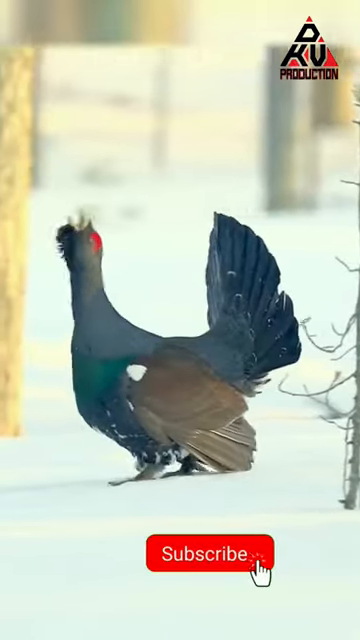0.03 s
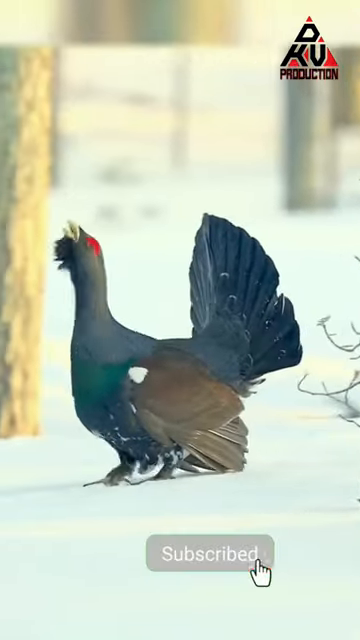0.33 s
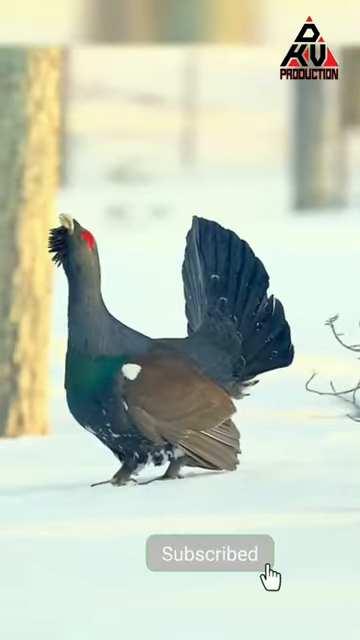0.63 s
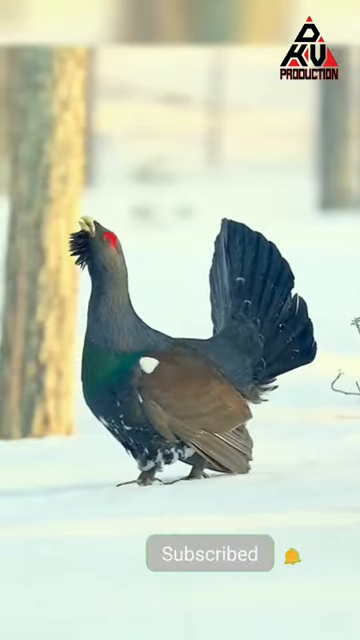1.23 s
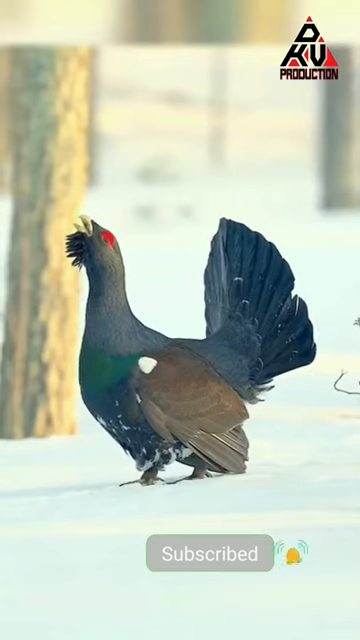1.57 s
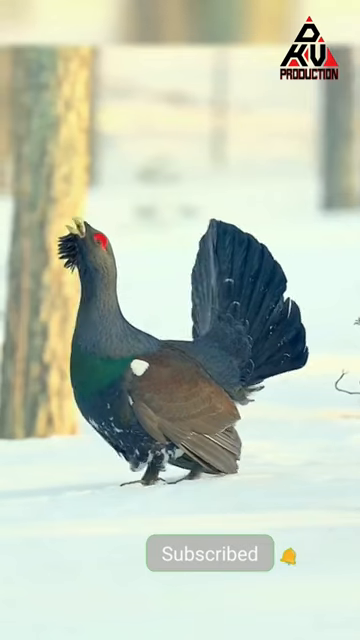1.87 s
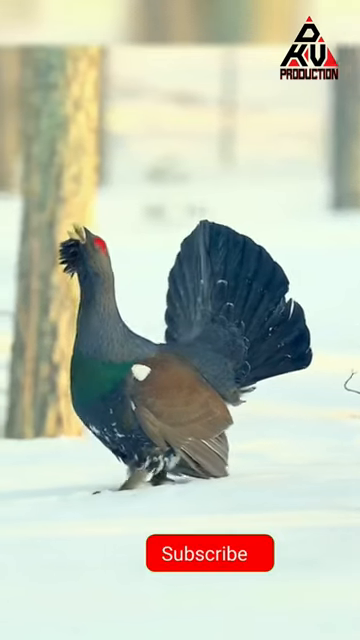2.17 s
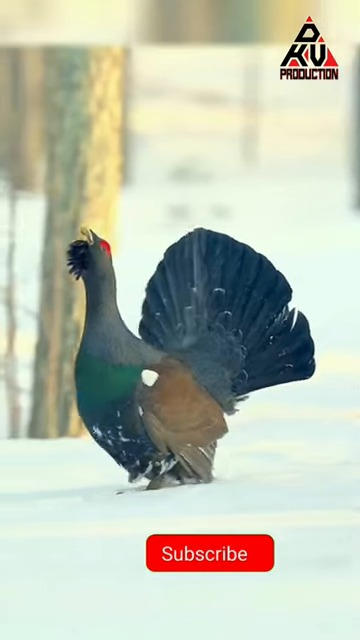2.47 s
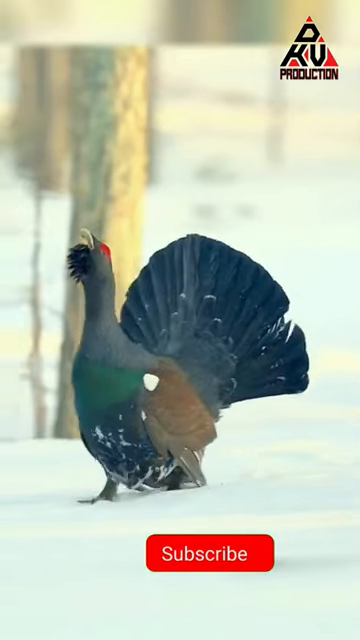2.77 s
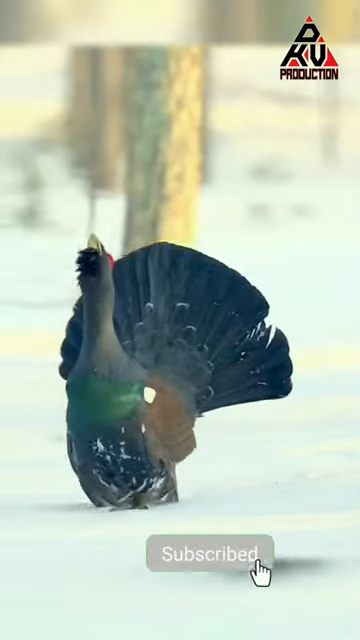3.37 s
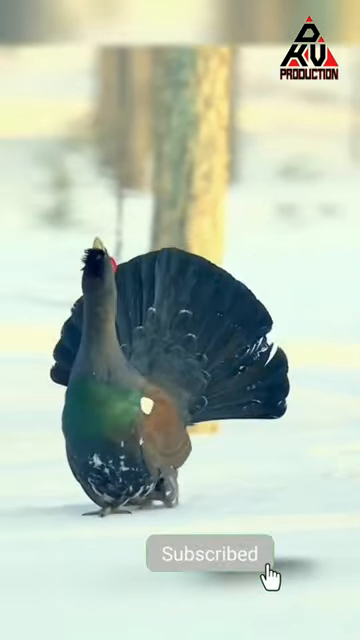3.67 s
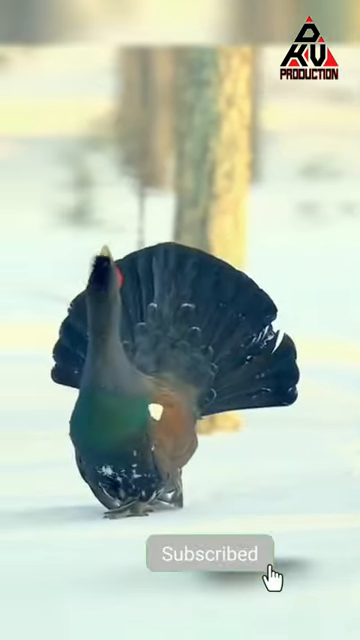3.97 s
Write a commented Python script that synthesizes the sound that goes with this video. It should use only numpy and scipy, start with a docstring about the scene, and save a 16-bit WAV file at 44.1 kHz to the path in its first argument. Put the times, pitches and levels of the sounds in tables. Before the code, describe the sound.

A large grouse calls straight ahead in a forest, starting with quick, squeaky rasps like a blade being sharpened until about 1.2 seconds. From around 1.8 seconds come sharp, hollow clicks, often in pairs, with hard ones near 1.9, 2.4 and 2.9 seconds. They speed up into a loud, short rattle around 3.7 seconds. A faint echo follows them, over steady hiss and a slight low rumble.

```python
"""First comes a second of raspy syllables, like a blade being whetted: a capercaillie in a snowy forest.
The bird rasps by pushing air through its throat. Then sharp releases make the throat ring in hollow
clicks, which come in pairs and speed up. The trees answer faintly. Hiss, a little rumble, a low hum
and thin whines run underneath, and a limiter briefly turns everything down after each hard click."""
import sys
import numpy as np
from scipy import signal
from scipy.fft import rfft, irfft, next_fast_len
from scipy.io import wavfile
from scipy.ndimage import uniform_filter1d, minimum_filter1d, map_coordinates

SR = 44100
rng = np.random.default_rng(int(sys.argv[2]) if len(sys.argv) > 2 else 0)


def unload_audio(sound):
    """Save the sound as a 16-bit wav file, at the path given as the first command line argument."""
    columns = np.transpose(np.atleast_2d(sound))
    # keep every value between -1 and 1, then stretch to whole-number steps
    steps = np.round(np.clip(columns, -1, 1) * 32767)
    wavfile.write(sys.argv[1], SR, steps.astype(np.int16))


N = 176400
TIME_S = np.arange(N) / SR


def amp(db):
    """Turn decibels into a number to multiply by."""
    return 10 ** (np.asarray(db) / 20)


def unit(x):
    """Scale a signal to an average strength (rms) of 1."""
    return x / np.sqrt(np.mean(x ** 2) + 1e-20)


def wobble(per_s):
    """A smooth curve through per_s random values a second."""
    return map_coordinates(rng.standard_normal(N // 8), [TIME_S * per_s], mode="mirror")


def filtered(x, gain_at):
    """Multiply each frequency in x by gain_at(hz)."""
    size = next_fast_len(N + SR // 4)
    return irfft(rfft(x, size) * gain_at(np.fft.rfftfreq(size, 1 / SR)), size)[..., :N]


def coloured(x, colour):
    """Shape the lows and highs of x with rows of (pitch_hz, gain_db)."""
    pitch_hz, gain_db = np.transpose(colour)
    return filtered(x, lambda hz: amp(np.interp(np.log(hz + 1), np.log(pitch_hz + 1), gain_db)))


def noise(colour):
    """Noise of the given colour and of strength 1."""
    return unit(coloured(rng.standard_normal(N), colour))


def fade(t, fade_s):
    """Die away by 60 dB every fade_s seconds."""
    return np.exp(-np.log(1000) * t / fade_s)


# How the throat colours rushing air: pitch_hz, gain_db
THROAT_COLOUR = [(300, -55), (1200, -34), (1600, -24), (2000, -9), (2500, -2), (3150, -4), (3600, -1.5),
                 (4000, -12), (4700, -17), (5400, -16), (5900, -8), (6550, -7), (6750, -29), (7600, -21),
                 (8450, -21), (9000, -38), (16000, -52)]
# The crisp top of a syllable: pitch_hz, gain_db
EDGE_COLOUR = [(7000, -17), (9200, -12), (11300, -9), (12650, 2), (12950, -11)]
# One syllable a row: start_s, rise_s, hold_s, fade_s, level_db,
# squeak_from_hz, squeak_to_hz, squeak_db (compared with the rasp)
SYLLABLES = [(-.02, 0.07, .02, 0.1166, -13, 2050, 2930, -4.5),
             (0.113, 0.017, 0.013, .10, -13.5, 2710, 2450, -4),
             (0.2, 0.0088, 0.0068, 0.22, -10, 3700, 2184, -1),
             (0.244, 0.025, 0.0046, 0.4, -18, 2500, 2400, -1.5),
             (0.401, 0.017, 0.0153, 0.092, -13.5, 2150, 2458, -3.5),
             (0.478, 0.04, 0.049, 0.12, -12.5, 2590, 3127, 0.5),
             (0.61, 0.022, 0.0055, 0.11, -15.5, 3300, 2355, -6),
             (0.646, 0.0063, 0.0092, 0.034, -21, 2200, 2180, 18),
             (0.707, 0.0082, 0.0074, 0.066, -17, 2690, 1905, -2.5),
             (0.771, 0.0022, 0.025, 0.27, -13.5, 2700, 2264, -2),
             (0.819, 0.023, 0.012, 0.22, -24.5, 2300, 2478, -2),
             (0.914, 0.035, 0.0056, 0.0556, -16.5, 2150, 3050, 3),
             (1.096, 0.052, 0.0069, 0.089, -20.5, 2400, 2440, 11)]
def whetting():
    """Gritty air rushes through the throat, with a crisp edge and a rough, gliding squeak."""
    grit = amp(2.9 * wobble(per_s=520))  # a fast flicker in loudness
    rasp = unit(coloured(rng.standard_normal(N) * grit, THROAT_COLOUR))
    edge = amp(-28) * unit(grit * noise(EDGE_COLOUR))
    phase_jitter = 1.15 * wobble(per_s=330)
    flutter = np.sqrt(2) * unit(grit)
    out = np.zeros(N)
    for start_s, rise_s, hold_s, fade_s, level_db, from_hz, to_hz, squeak_db in SYLLABLES:
        t = TIME_S - start_s
        swell = np.clip(t / rise_s, 0, 1) ** 2 * fade(np.maximum(t - rise_s - hold_s, 0), fade_s)
        pitch_hz = np.interp(t, [0, rise_s + hold_s + fade_s / 10], [from_hz, to_hz])
        squeak = flutter * np.sin(2 * np.pi * np.cumsum(pitch_hz) / SR + phase_jitter)
        voice = amp(level_db) * (rasp + amp(squeak_db) * squeak) + amp(level_db / 2) * edge
        out += swell * voice / np.hypot(1, amp(squeak_db))
    return out


def patchy(x, depth_db=2.6, frame_samples=1024):
    """Make a noise uneven: random patches of pitch and time get a little louder or softer."""
    spectrum = signal.stft(x, nperseg=frame_samples)[2]
    patches = uniform_filter1d(rng.standard_normal(spectrum.shape), size=3, axis=0)
    patches = unit(uniform_filter1d(patches, size=12, axis=1))
    return unit(signal.istft(spectrum * amp(depth_db * patches), nperseg=frame_samples)[1][:N])


# The broad hiss: pitch_hz, gain_db
HISS_COLOUR = [(20, -67), (130, -21), (330, 0.5), (550, -2), (800, 6.5), (1100, 4), (1500, 6.5), (2600, -1),
               (4200, -1.5), (5400, 2), (6900, -9), (8300, 8.5), (9000, 4.5), (10500, 2.5), (13000, 3.5),
               (15000, -7.5), (15800, 5.5)]
# How much of the hiss spreads out to the sides: pitch_hz, gain_db
HISS_SPREAD = [(100, -16), (500, -35), (3000, -35), (5000, -24), (9000, -20), (14000, -17)]
# Its slow drift in loudness: time_s, level_db
HISS_LOUDNESS = [(0, -40.5), (.9, -37.5), (1.75, -34.5), (2.0, -38), (2.3, -36), (2.8, -37), (3.3, -39),
                 (3.7, -41), (4, -42)]
def hiss():
    """A broad, unbroken hiss, almost the same in the left and right ears."""
    level = amp(np.interp(TIME_S, *np.transpose(HISS_LOUDNESS)))
    centre = patchy(noise(HISS_COLOUR))
    side = coloured(noise(HISS_COLOUR), HISS_SPREAD)
    return level * np.array([centre + side, centre - side])


# A band of hiss around 3 kHz: pitch_hz, gain_db
MIDDLE_COLOUR = [(1000, -28), (1800, -16), (2100, -6), (2350, -11), (2600, -1), (2810, 2.5), (3200, -.5),
                 (3600, -2.5), (4100, -12.5), (6000, -16.5), (9000, -46)]
# A thinner, higher band: pitch_hz, gain_db
THIN_COLOUR = [(3000, -21.5), (4500, -12), (6200, -3.5), (6700, -11.5), (7300, -7), (8400, -8),
               (9200, -18.5), (14000, -20)]
# How loud the two bands are: time_s, middle_db, thin_db
BAND_LOUDNESS = [(0, -24, -35), (.4, -30, -35.5), (.75, -29, -34), (.9, -27.5, -30.5), (1.08, -29, -33.5),
                 (1.17, -28.5, -41), (1.33, -26.5, -45), (1.48, -30.5, -47), (1.6, -35, -42),
                 (2.0, -32, -49), (2.08, -40, -42.5), (2.35, -33, -43), (2.56, -29, -64), (2.8, -33, -38),
                 (3.2, -31, -55), (3.7, -31, -57), (4, -32, -40.5)]
def swelling_hiss():
    """Two narrower bands of hiss swell and sink."""
    time_s, middle_db, thin_db = np.transpose(BAND_LOUDNESS)
    middle = amp(np.interp(TIME_S, time_s, middle_db)) * patchy(noise(MIDDLE_COLOUR))
    thin = amp(np.interp(TIME_S, time_s, thin_db)) * noise(THIN_COLOUR)
    return middle + thin


# The deep rumble: pitch_hz, gain_db
RUMBLE_COLOUR = [(20, -3), (32, 0), (45, -19), (60, -31), (120, -43), (300, -38), (1000, -78)]
def rumble(sink_db_per_s=1.5):
    """A soft, unsteady rumble in both ears slowly gets quieter."""
    level = amp(-50 - sink_db_per_s * TIME_S + 3 * wobble(6))
    centre, side = noise(RUMBLE_COLOUR), amp(-14) * noise(RUMBLE_COLOUR)
    return level * np.array([centre + side, centre - side])


def hum(pitch_hz=189.4, sink_db_per_s=1.94):
    """One low, wavering tone slowly gets quieter."""
    level = amp(-60.5 - sink_db_per_s * TIME_S + 2.6 * wobble(7))
    return np.sqrt(2) * level * np.sin(2 * np.pi * pitch_hz * TIME_S + .5 * wobble(5))


# One high tone a row: pitch_hz, level_db
WHINE_TONES = [(7752, -54), (9130, -58), (13954, -62)]
def whines():
    """Faint, very high tones waver slightly."""
    out = np.zeros(N)
    for pitch_hz, level_db in WHINE_TONES:
        level = amp(level_db + .86 * wobble(2.9))
        out += np.sqrt(2) * level * np.sin(2 * np.pi * pitch_hz * TIME_S + .5 * wobble(8))
    return out


def forest_echo(bird):
    """Nearby trunks scatter a short answer, the wood behind them a long, faint one."""
    t = np.arange(SR) / SR
    near = rng.standard_normal(SR) * fade(t, fade_s=.19) * (t > .004)
    far = rng.standard_normal(SR) * fade(t, fade_s=1.2) * (1 - np.exp(-t / .0033))
    echo = amp(-18) * near / np.linalg.norm(near) + amp(-27) * far / np.linalg.norm(far)
    return signal.fftconvolve(bird, echo)[:N]


# The bright noise in a click's opening snap: pitch_hz, gain_db
TICK_COLOUR = [(1800, -16.5), (4700, -0.5), (6000, -8), (13000, -24)]
# The throat's weaker tones: pitch_hz, level_db (compared with the main tone), fade_s (in a soft click)
WEAK_TONES = [(2430, -24, 0.076), (3900, -18, 0.023), (4200, -23, 0.093), (4800, -24, 0.036),
              (5730, -22, 0.027), (6760, -36, 0.036)]
# One click a row, a snap and three throat tones:
# start_s, snap_db (before a 3 dB boost), low_hz, low_db, main_hz, main_db, upper_hz, upper_db
THROAT_CLICKS = [(1.1112, -10, 2115, -29, 2640, -11, 3560, -23),
                 (1.2392, -25, 2020, -46, 2790, -4.5, 2997, -5.5),
                 (1.818, -22, 2200, -28, 2710, -11, 4040, -13.5),
                 (1.8805, 4, 2117, 2, 2690, -2, 4200, -8.5), (1.949, -25, 2190, -27, 2760, -9, 3140, -12),
                 (1.9988, -29, 2060, -24, 2700, -9, 3160, -10.5),
                 (2.3904, 5.5, 2080, 4, 2810, -4.5, 3200, -17),
                 (2.4271, -24, 2155, -19, 2746, -10.5, 3350, -21),
                 (2.498, -29, 2140, -17, 2778, -4, 3485, -0.5),
                 (2.551, -25, 2180, -41, 2676, -11.5, 3160, -13), (2.8802, 7, 2126, 3, 2900, -5, 3296, 2.5),
                 (2.9661, -22, 2120, -16.5, 2720, -21, 3540, -14),
                 (3.0544, -21, 2120, -29, 2784, -8, 2950, -23),
                 (3.17, -40, 2110, -47, 2786, -5.5, 3150, -10),
                 (3.2501, 5, 2066, -8.5, 2770, -4.5, 3390, 3),
                 (3.3175, -28, 2105, -21.5, 2760, -15.5, 3450, -16),
                 (3.4845, 2.5, 2044, -10.5, 3020, -1.5, 3350, 3.5),
                 (3.533, -32, 2020, -21.5, 2763, -5.5, 3430, -8.5),
                 (3.6387, 3.5, 2005, -7, 2920, -3, 3290, 5.5), (3.732, 3, 1970, -5, 2815, 2, 3230, 8),
                 (3.774, 5.5, 1950, -13, 2790, 7.5, 3100, 9), (3.815, 6, 2090, -28, 2855, 5, 3135, 8.5),
                 (3.859, -32, 2030, -27, 2850, -13.5, 3730, -13)]
def clicks(snap_s=.000325, rise_s=.00099):
    """A sharp release rings the throat, whose tones change with how wide the beak opens."""
    out, t = np.zeros(N), np.arange(SR // 10) / SR
    air, tick = noise(THROAT_COLOUR), amp(-21) * noise(TICK_COLOUR)
    from_peak_s = t - 2 * snap_s
    snap_shape = np.exp(-(from_peak_s / snap_s) ** 2)
    build_up = 1 - np.exp(-(t / rise_s) ** 2)
    for start_s, snap_db, low_hz, low_db, main_hz, main_db, upper_hz, upper_db in THROAT_CLICKS:
        first = round(start_s * SR)
        span = slice(first, first + len(t))
        # Depth is the low tone's share of the energy; deep clicks snap at a lower pitch.
        depth = amp(low_db) ** 2 / np.sum(amp([low_db, main_db, upper_db]) ** 2)
        snap_hz = 3030 - 490 * depth ** 2
        snap = snap_shape * (np.sin(2 * np.pi * snap_hz * from_peak_s) + tick[span])
        hardness = min(amp(max(snap_db, upper_db)), 1)
        damping = 1 - hardness / 2  # hard clicks die sooner and scrape less
        tones = [(low_hz, low_db, .055), (main_hz, main_db, .058), (upper_hz, upper_db, .044)]
        for hz, db, fade_s in WEAK_TONES:
            tones.append((hz * (1 + rng.normal(0, .022)), main_db + db + rng.normal(0, 3), fade_s))
        # One more tone below the low one makes hard, deep clicks sound hollow.
        hollow_db = -30 + 15 * hardness * np.sqrt(depth) + rng.normal(0, 2)
        tones.append((.655 * low_hz, hollow_db, .069))
        ring = sum(amp(db) * fade(t, fade_s * damping) * np.sin(2 * np.pi * hz * t)
                   for hz, db, fade_s in tones)
        scrape = amp(main_db - 15) * damping * fade(t, .067 * damping) * air[span]
        out[span] += amp(snap_db + 3) * snap + (ring + scrape) * build_up
    return out


def scene():
    """The bird stands straight ahead, with its echo and the background around it."""
    bird = clicks() + whetting()
    return bird + forest_echo(bird) + swelling_hiss() + hiss() + rumble() + hum() + whines()


def record(dry, ceiling=.9, recover_db_per_s=144, look_ahead_s=.0012, top_hz=15700):
    """A limiter turns loud peaks down fast and eases back up; then the highest treble is cut."""
    over_db = 20 * np.log10(np.maximum(np.abs(dry).max(axis=0) / ceiling, 1))
    recovery_db = recover_db_per_s * TIME_S
    cut_db = np.maximum.accumulate(over_db + recovery_db) - recovery_db
    window = 2 * round(look_ahead_s * SR) + 1
    gain = uniform_filter1d(minimum_filter1d(amp(-cut_db), window), window)  # dips just before a peak
    return filtered(dry * gain, lambda hz: hz < top_hz)


dry = scene()
out = record(dry)
unload_audio(out)
```